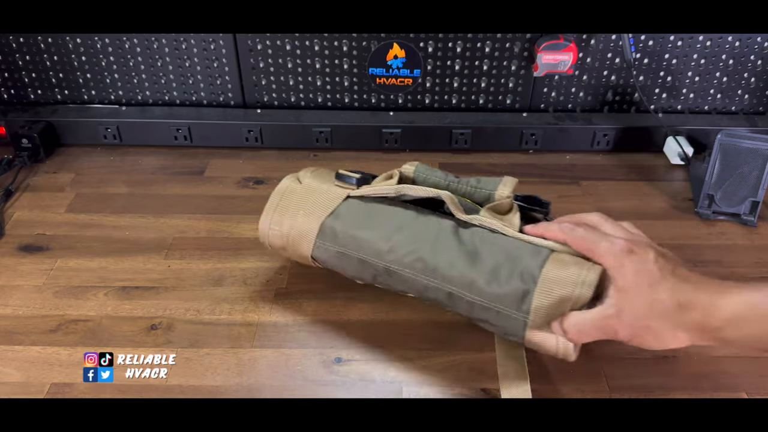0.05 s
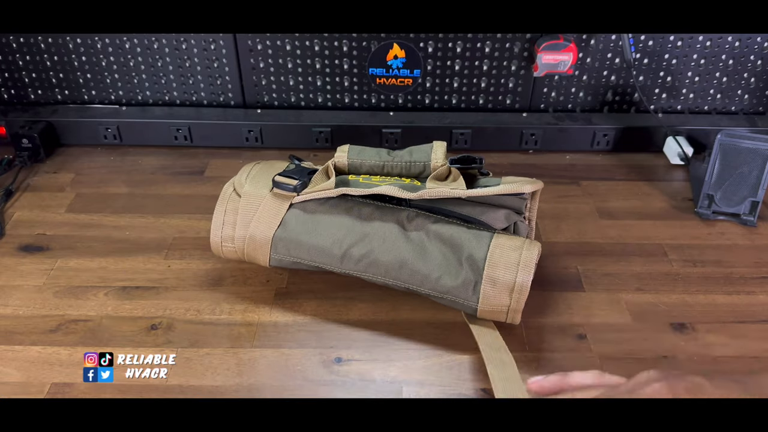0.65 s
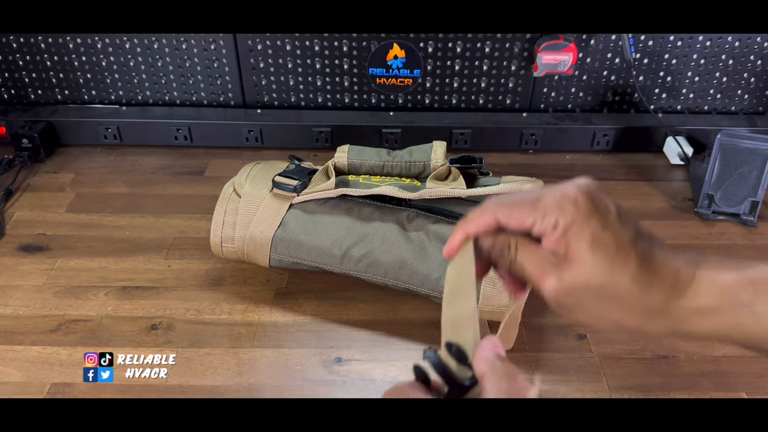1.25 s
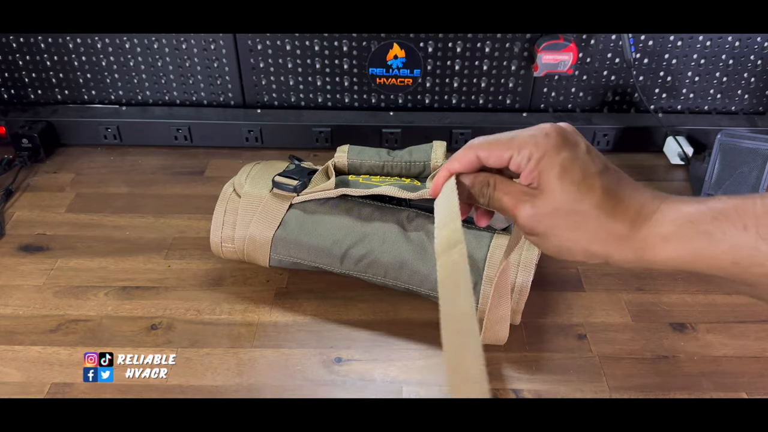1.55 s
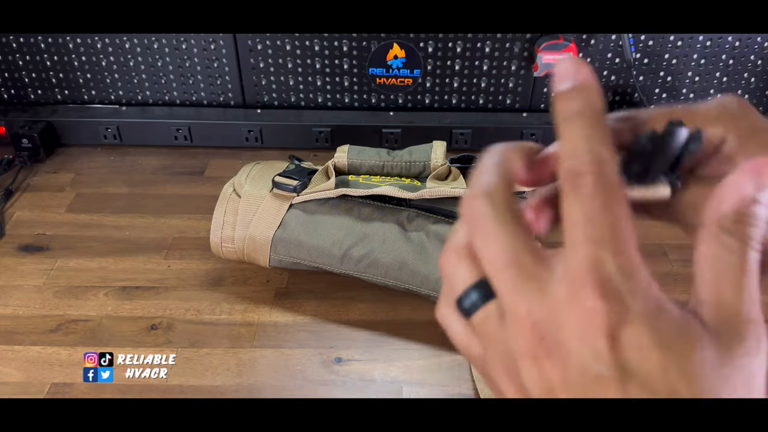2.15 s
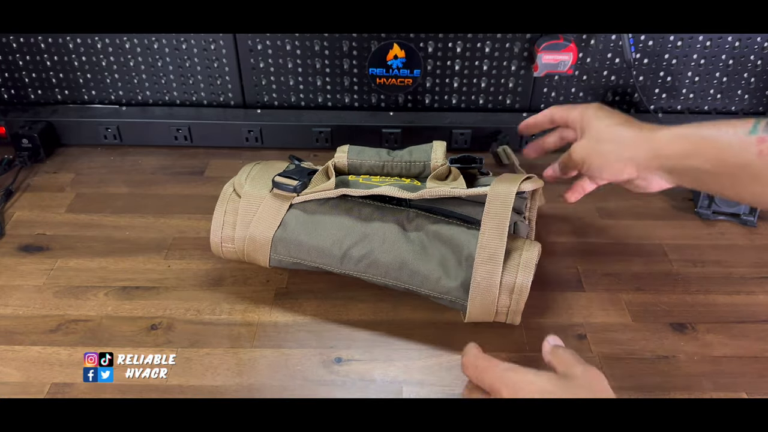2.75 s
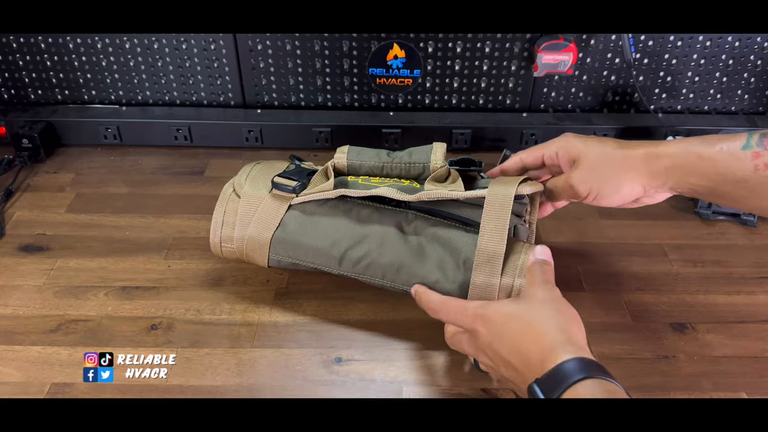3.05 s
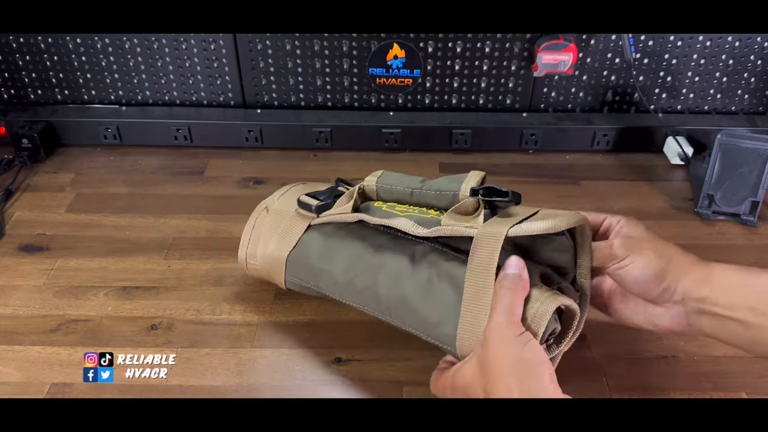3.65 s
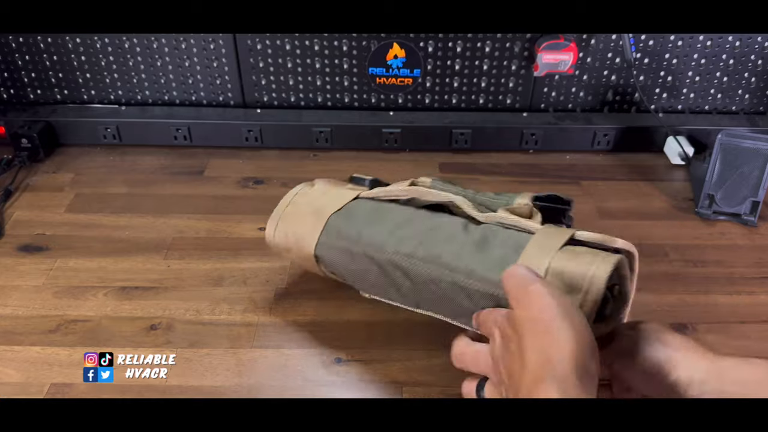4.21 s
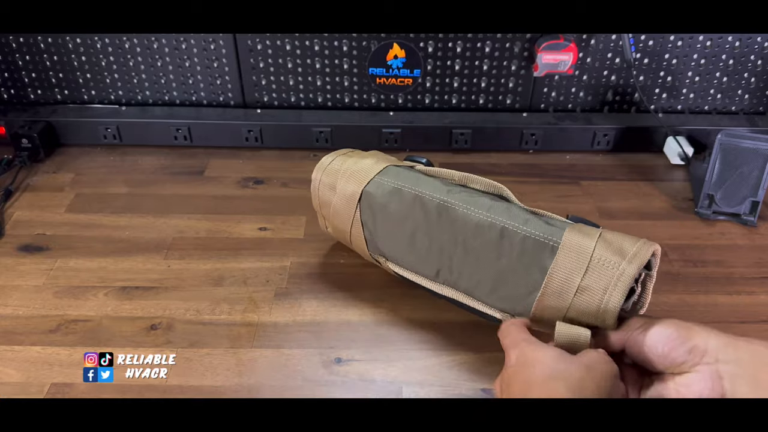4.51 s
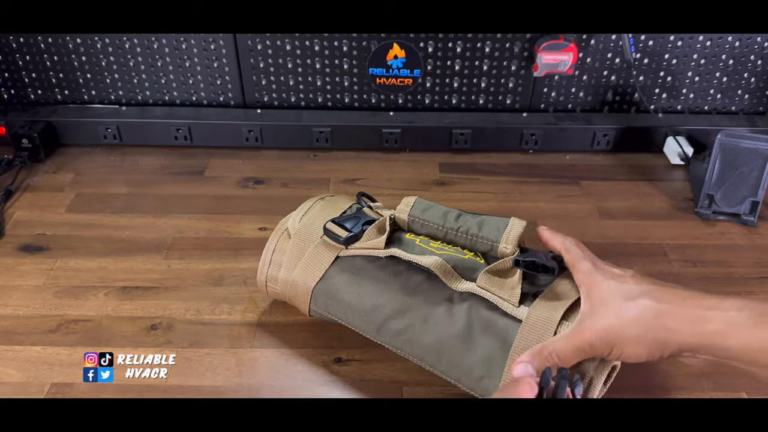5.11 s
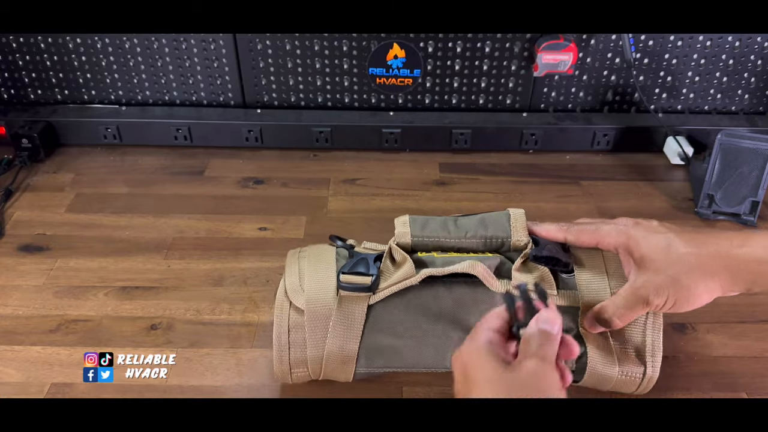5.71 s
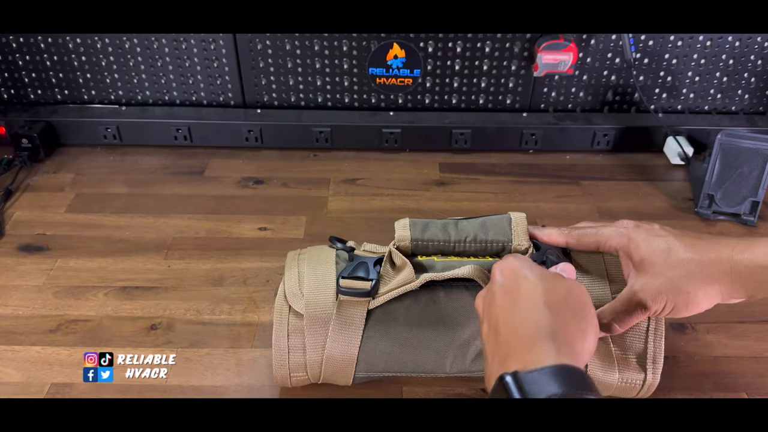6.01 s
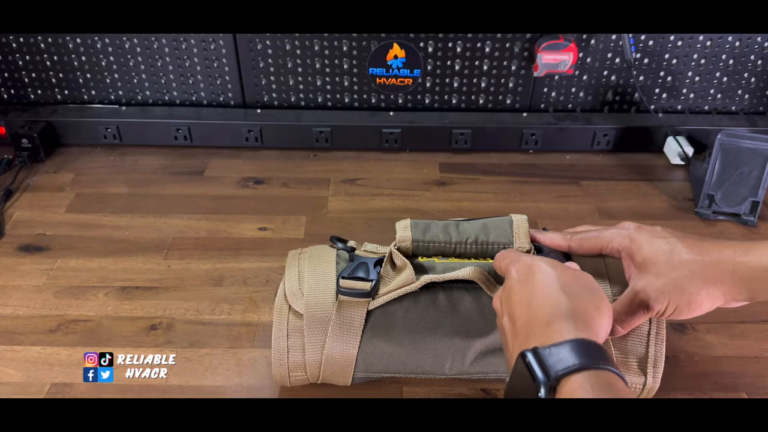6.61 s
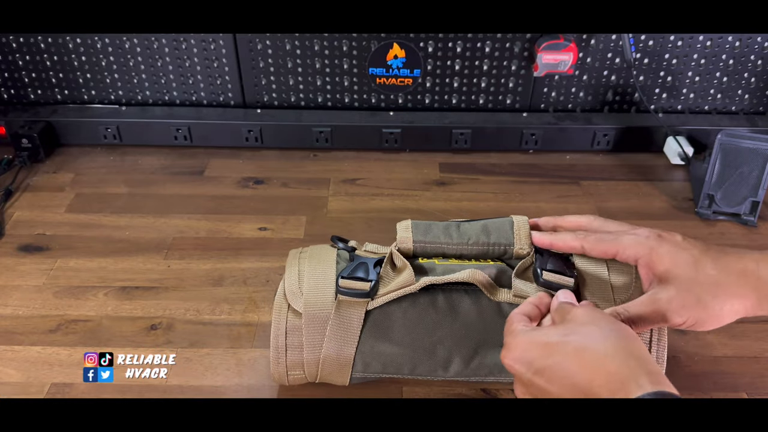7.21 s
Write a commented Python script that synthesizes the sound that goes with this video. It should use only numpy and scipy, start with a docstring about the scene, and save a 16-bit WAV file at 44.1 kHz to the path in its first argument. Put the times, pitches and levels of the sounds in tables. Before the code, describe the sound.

Soft cloth rustling and dull knocks, broken by a buckle clacking onto a wooden bench and then snapping shut.

```python
"""Buckling a canvas tool roll

A tool roll is handled on a wooden bench in a small workshop with a faint hum. Stick-slip friction
makes cloth and webbing rustle, and the tools inside knock dully. A flung plastic buckle excites
the modes of the bench with a clack. The roll is turned, the buckle is lined up, and its prongs
spring into their shell with a snap. Both loud impacts reverberate in the room."""
import sys
import numpy as np
from scipy import signal
from scipy.fft import rfft, irfft
from scipy.io import wavfile

SR = 44100
rng = np.random.default_rng(int(sys.argv[2]) if len(sys.argv) > 2 else 0)


def output_pcm(signal):
    """Save a mono or channel-first signal as 16-bit PCM at the path in sys.argv[1].

    Samples are clipped to [-1, 1] before scaling.
    """
    pcm = np.clip(np.atleast_2d(signal).T, -1, 1) * 32767
    wavfile.write(sys.argv[1], SR, np.round(pcm).astype(np.int16))


N = 320166

# still air of the workshop: (frequency [Hz], relative level [dB])
AIR_SPECTRUM = [(20, -7.5), (55, -5), (300, -6.5), (440, -13.5), (850, -19.5), (1100, -27), (2000, -32),
                (5000, -31.5), (16000, -38)]
# partials of the hum: (frequency [Hz], early level [dB], late level [dB])
HUM_PARTIALS = [(75, -71, -67), (108.4, -71.5, -74.5), (214.3, -76.5, -71), (237, -71.5, -91.5),
                (313.4, -85.5, -69)]
# reverberation time of the workshop: (frequency [Hz], t60 [s])
ROOM_DECAY = [(120, 0.34), (400, 0.56), (1000, 0.66), (2500, 0.64), (6000, 0.6), (15000, 0.4)]
# soft rub of the padded roll: (frequency [Hz], relative level [dB])
CANVAS_SPECTRUM = [(120, -11), (250, -9), (480, -0.5), (750, -3), (1050, -4.5), (1600, -11), (2600, -15),
                   (4500, -27), (12000, -39.5)]
# hiss of the weave: (frequency [Hz], relative level [dB])
WEAVE_SPECTRUM = [(800, -13.5), (2500, 3), (4200, -1.5), (6800, -6), (10000, -11), (16000, -25)]
# hands sliding the cloth: (start [s], duration [s], rub level [dB], hiss re rub before trim [dB])
HAND_STROKES = [(-0.08, 0.28, -57, -1), (0.35, 0.047, -64, 0), (1.175, 0.14, -55.5, 0),
                (1.21, 0.066, -53.5, -8), (2.9, 0.4, -57, -20), (3.2, 0.33, -54, -7.5),
                (3.27, 0.091, -59, -0.5), (3.54, 0.27, -54.5, -8), (3.82, 0.21, -59, -10),
                (3.98, 0.33, -52, -7.5), (4.32, 0.31, -61, -23), (4.64, 0.15, -59.5, -7),
                (4.905, 0.18, -57.5, -14.5), (5.14, 0.55, -56.5, -13), (5.27, 0.25, -57.5, -3.5),
                (5.72, 0.16, -64.5, -8.5), (5.94, 0.021, -57, -26)]
# low scuff of cloth on wood: (frequency [Hz], relative level [dB])
SCUFF_SPECTRUM = [(70, -22), (160, 1.5), (400, -5.5), (3000, -50)]
# rasp of the weave on wood: (frequency [Hz], relative level [dB])
RASP_SPECTRUM = [(400, -20), (1150, 2.5), (2600, -2.5), (3400, -10.5), (14000, -36)]
# roll and strap dragged on the bench: (start [s], duration [s], scuff level [dB], rasp re scuff [dB])
DRAGS = [(-0.02, 0.093, -56, -5.5), (0.15, 0.13, -58.5, 3), (0.93, 0.063, -54.5, -21),
         (2.07, 0.052, -63.5, -23)]
# webbing and seams catching: (time [s], level [dB], centre frequency [Hz], t60 [s])
SCRATCHES = [(3.967, -44.5, 4800, 0.043), (4.036, -50, 3170, 0.06), (4.056, -52, 4970, 0.028),
             (4.08, -53, 4180, 0.032), (4.119, -52, 4000, 0.04), (4.1475, -49, 6500, 0.027),
             (4.2074, -43, 6950, 0.016), (4.216, -45.5, 3300, 0.074), (4.944, -50, 3000, 0.043)]
# tools and fingers knocking: (time [s], peak level [dB], pitch [Hz], tick re body before boost [dB])
KNOCKS = [(0.206, -36, 520, -23), (0.283, -42, 760, -40), (1.226, -40, 960, -22), (1.266, -41, 610, -9),
          (2.908, -37, 497, -37), (3.089, -36, 550, -14.5), (3.137, -32.5, 655, -45),
          (3.274, -36, 484, -17), (3.449, -37.5, 520, -20), (3.472, -37.5, 520, -16),
          (4.058, -35.5, 520, -8), (4.144, -28.5, 676, -17), (4.171, -36, 501, -6), (4.208, -34, 520, -5),
          (4.324, -31.5, 1060, -36), (4.731, -37, 533, -18), (4.757, -35.5, 535, -19),
          (4.913, -43.5, 500, -35), (4.936, -40, 536, -22), (5.141, -40, 450, -23)]
# the roll settling on the bench: (time [s], level [dB], frequency [Hz], t60 [s])
BUMPS = [(0.117, -41.5, 125, 0.089), (3.351, -28, 134, 0.076), (3.368, -42, 158, 0.15)]
# hollow rub of the buckle on the roll: (frequency [Hz], relative level [dB])
HOLLOW_SPECTRUM = [(200, -24), (370, -11.5), (470, 2.5), (650, -11.5), (1000, -12), (2000, -25),
                   (8000, -44.5)]
# scrape of plastic on plastic: (frequency [Hz], half-width [Hz], relative level [dB])
SCRAPE_RESONANCES = [(3000, 600, -6), (5200, 300, -3.5), (7000, 400, 1)]
# the buckle worked along its webbing: (start [s], duration [s], rub level [dB], scrape re rub [dB])
NUDGES = [(5.725, 0.033, -65.5, -2.5), (6.045, 0.068, -56.5, -34), (6.18, 0.1, -60, -15),
          (6.51, 0.1, -58.5, -19.5), (6.65, 0.07, -62, -7), (6.85, 0.16, -57.5, -18)]
# the buckle halves touching: (time [s], level [dB], main resonance [Hz], t60 [s])
TOUCHES = [(6.0488, -54.5, 7000, 0.026), (6.2808, -48.5, 3050, 0.03), (6.48, -55.5, 2300, 0.024),
           (6.522, -54.5, 2200, 0.035), (6.5564, -48, 4400, 0.016), (6.57, -52.5, 4900, 0.013)]
# the shell colouring the buckle's click: (frequency [Hz], half-width [Hz], relative level [dB])
CLICK_RESONANCES = [(778, 25, -1), (930, 99, -10), (2380, 140, -3.5), (2567, 80, 0), (2950, 210, -10),
                    (3900, 290, -13.5), (4890, 160, -9.5), (5400, 160, -12.5), (6950, 560, -11.5),
                    (9100, 1500, -19.5)]
# the struck bench top, with nearby things faintly ringing on: (frequency [Hz], level [dB], t60 [s])
BENCH_AND_NEARBY_MODES = [(130, -35.5, 0.13), (263, -25.5, 0.07), (359, -35, 0.35), (426, -27.5, 0.079),
                          (503, -16, 0.035), (689, -18.5, 0.06), (860, -19.5, 0.035), (1070, -38, 0.46),
                          (1138, -37.5, 0.4), (1307, -37, 0.46), (1440, -21, 0.05), (1770, -14.5, 0.036),
                          (3190, -15.5, 0.018)]
# crack of the buckle landing: (frequency [Hz], relative level [dB])
CRACK_SPECTRUM = [(60, -24.5), (200, -8), (360, 0.5), (800, -4.5), (1200, -1), (2700, -10), (4000, -14.5),
                  (5200, -24), (8400, -31), (13000, -44)]
# the buckle's prongs and hollow shell: (frequency [Hz], level [dB], t60 [s])
BUCKLE_MODES = [(902, -20.5, 0.028), (1900, -27.5, 0.026), (2310, -21, 0.037), (2492, -20.5, 0.04),
                (2710, -19, 0.039), (3150, -23.5, 0.018), (3940, -20, 0.02), (4720, -14.5, 0.02),
                (5260, -22, 0.043), (6610, -12, 0.018), (9220, -19, 0.014)]


def amp(db):
    """Amplitude ratio of a level in decibels."""
    return 10 ** (np.asarray(db) / 20)


def unit_rms(x):
    """Normalisation to rms 1."""
    return x / np.sqrt(np.mean(x ** 2) + 1e-20)


def curve_at(points, hz):
    """Interpolation on a logarithmic frequency axis."""
    f, value = np.transpose(points)
    return np.interp(np.log(hz + 1), np.log(f + 1), value)


def coloured(x, spectrum):
    """Source-filter principle: an excitation shaped by a spectrum, at rms 1."""
    gain = amp(curve_at(spectrum, np.fft.rfftfreq(len(x), 1 / SR)))
    return unit_rms(irfft(rfft(x) * gain, len(x)))


def peaked(resonances):
    """Resonance: bell-shaped peaks summed into one spectrum."""
    hz = np.geomspace(20, SR / 2, 900)
    gain = sum(amp(db) / (1 + ((hz - centre) / width) ** 2) for centre, width, db in resonances)
    return np.column_stack([hz, 20 * np.log10(gain)])


def wander(corner_hz):
    """Random modulation: low-passed noise at rms 1."""
    hz = np.fft.rfftfreq(N, 1 / SR)
    return unit_rms(irfft(rfft(rng.standard_normal(N)) / (1 + (hz / corner_hz) ** 2), N))


def add(mix, s, sound):
    """Superposition of a sound starting at s seconds."""
    part = mix[max(round(s * SR), 0):][:len(sound)]
    part += sound[:len(part)]


def times(size=8192):
    """Time axis in seconds, by default that of one transient."""
    return np.arange(size) / SR


def decay(t, t60):
    """Damping: an exponential fall of 60 dB in t60 seconds."""
    return np.exp(-np.log(1000) * t / t60)


def envelope(t60, rise_s):
    """Transient response: a quick rise, then exponential decay."""
    t = times()
    return decay(t, t60) * (1 - np.exp(-t / rise_s))


def ring(modes, contact_s=0.0001):
    """Modal vibration after a brief contact; neighbouring modes start in opposite phase."""
    t = times()
    swing = sum((-1) ** k * amp(db) * decay(t, t60) * np.cos(2 * np.pi * hz * t)
                for k, (hz, db, t60) in enumerate(modes))
    return swing * (1 - np.exp(-(t / contact_s) ** 2))


def burst(spectrum, t60, rise_s=0.0001):
    """Modal overlap: dense, damped vibrations merge into decaying noise."""
    shape = envelope(t60, rise_s)
    return shape * coloured(rng.standard_normal(len(shape)), spectrum)


def pulse(spectrum, size=8192):
    """Minimum phase: the sharpest causal pulse with a given spectrum, at energy 1."""
    log_gain = np.log(amp(curve_at(spectrum, abs(np.fft.fftfreq(size, 1 / SR)))))
    wave = np.fft.ifft(np.exp(np.conj(signal.hilbert(log_gain)))).real
    return wave / np.linalg.norm(wave)


def stick_slip(per_s, spread_db, smooth):
    """Stick-slip friction: threads release as tiny uneven clicks in a smooth hiss."""
    size = amp(spread_db * np.minimum(rng.exponential(1, N), 4))
    slips = size * rng.choice([-1, 1], N) * (rng.random(N) < per_s / SR)
    return unit_rms(slips) + smooth * rng.standard_normal(N)


def sliding(strokes, attack_s=0.016, release_s=0.033, rub_arch_db=1, hiss_arch_db=3.5):
    """Friction noise grows with speed: rub and hiss gains peak mid-stroke, and strokes add in power."""
    t = times(N)
    rub_power, hiss_power = np.zeros(N), np.zeros(N)
    for start, length, db, bright_db in strokes:
        age = np.maximum(t - start, 0)
        moving = np.minimum(age / attack_s, 1) * np.exp(-np.maximum(age - length, 0) / release_s)
        slowness = 1 - np.sin(np.pi * np.minimum(age / length, 1))
        rub_power += (moving * amp(db - rub_arch_db * slowness)) ** 2
        hiss_power += (moving * amp(db + bright_db - hiss_arch_db * slowness)) ** 2
    return np.sqrt(rub_power), np.sqrt(hiss_power)


def background(air_db=-65, waver_rad=0.45):
    """Noise floor: quiet air and a phase-modulated hum whose partials shift in balance."""
    t = times(N)
    out = amp(air_db) * coloured(rng.standard_normal(N), AIR_SPECTRUM)
    for hz, early_db, late_db in HUM_PARTIALS:
        rms = amp(np.interp(t, [2.6, 4.8], [early_db, late_db]))
        out += np.sqrt(2) * rms * np.sin(2 * np.pi * hz * t + waver_rad * wander(8.1))
    return out


def workshop(x, gap_s=0.0042, build_s=0.0086):
    """Reverberation: reflections build up after a short gap and each band decays at its own rate."""
    hz, t, bands = signal.stft(rng.standard_normal(SR), SR, nperseg=256)
    tail = signal.istft(bands * decay(t, curve_at(ROOM_DECAY, hz)[:, None]), SR)[1]
    tail *= np.clip((times(len(tail)) - gap_s) / build_s, 0, 1)
    return signal.fftconvolve(x, tail / np.linalg.norm(tail))[:N]


def canvas_rustle(hiss_trim_db=-1, grip_db=1, rest_rub_db=-75, rest_hiss_db=-89):
    """Sliding friction: uneven jerks drive the soft rub of the canvas and the hiss of its weave."""
    rub, hiss = sliding(HAND_STROKES)
    rub = np.hypot(rub, amp(rest_rub_db))  # the cloth stirs faintly between strokes
    hiss = np.hypot(amp(hiss_trim_db) * hiss, amp(rest_hiss_db))
    threads = stick_slip(per_s=2500, spread_db=2.5, smooth=0.94)
    creases = stick_slip(per_s=900, spread_db=2.5, smooth=0.84)  # stiff folds give way less often
    grip = amp(grip_db * wander(33))
    return grip * (rub * coloured(threads, CANVAS_SPECTRUM) + hiss * coloured(creases, WEAVE_SPECTRUM))


def cloth_drags():
    """Friction on wood: dragged cloth scuffs the bench and rasps where it is pressed down."""
    scuff, rasp = sliding(DRAGS)
    slips = stick_slip(per_s=1500, spread_db=3, smooth=0.74)
    return scuff * coloured(slips, SCUFF_SPECTRUM) + rasp * coloured(slips, RASP_SPECTRUM)


def seam_scratches(relative_width=0.64, slips_per_s=2200, smooth=0.08):
    """Stick-slip release: a caught seam lets go in a dying run of sharp slips."""
    out = np.zeros(N)
    for s, db, hz, t60 in SCRATCHES:
        shape = envelope(t60, rise_s=0.00068)
        size = len(shape)
        slips = rng.choice([-1, 1], size) * (rng.random(size) < slips_per_s / SR)
        friction = slips + smooth * rng.standard_normal(size)
        add(out, s, amp(db) * shape * coloured(friction, peaked([(hz, relative_width * hz, 0)])))
    return out


def tool_knocks(body_t60=0.059, tick_boost_db=3):
    """Damped impact: muffled knocks of tools and fingers, each a dull body and a shorter tick."""
    out = np.zeros(N)
    tick_spectrum = [(900, -24), (2800, 15), (4500, 0.5), (8000, -6), (15000, -29)]
    for s, db, hz, tick_db in KNOCKS:
        body_spectrum = [(hz / 4, -24), (hz * 0.53, -6), (hz, 0), (hz * 1.28, -5),
                         (hz * 2, -11), (hz * 5, -29), (hz * 16, -58)]
        body = burst(body_spectrum, body_t60, rise_s=0.00047)
        tick = burst(tick_spectrum, 0.63 * body_t60, rise_s=0.00042)
        knock = body + amp(tick_db + tick_boost_db) * tick
        add(out, s, amp(db) * knock / abs(knock).max())
    return out


def roll_bumps():
    """Soft impact: the heavy padded roll meets the bench and excites one low, damped mode."""
    out = np.zeros(N)
    for s, db, hz, t60 in BUMPS:
        add(out, s, amp(db) * np.sin(2 * np.pi * hz * times()) * envelope(t60, rise_s=0.0024))
    return out


def buckle_nudges(grip_db=2):
    """Friction drives resonances: the pushed buckle rubs hollowly on the roll and its plastic scrapes."""
    rub, scrape = sliding(NUDGES)
    slips = stick_slip(per_s=840, spread_db=1.5, smooth=0.91) * amp(grip_db * wander(46))
    return rub * coloured(slips, HOLLOW_SPECTRUM) + scrape * coloured(slips, peaked(SCRAPE_RESONANCES))


def buckle_touches(half_width_hz=750, shell_db=-7, rise_s=0.0002):
    """Selective excitation: where the buckle halves touch decides which part rings most."""
    out = np.zeros(N)
    for s, db, hz, t60 in TOUCHES:
        part = burst(peaked([(hz, half_width_hz, 0)]), t60, rise_s)
        shell = burst(peaked(CLICK_RESONANCES), t60, rise_s)
        add(out, s, amp(db) * (part + amp(shell_db) * shell))
    return out


def buckle_clack(land_s=2.640, flat_s=2.6425, room_db=3.5):
    """Impulse excitation: the buckle lands on edge, rings bench and nearby things, and chatters flat."""
    direct, to_room = np.zeros(N), np.zeros(N)
    crack = pulse(CRACK_SPECTRUM)
    add(direct, land_s, ring(BENCH_AND_NEARBY_MODES) + amp(-2) * crack)
    add(direct, flat_s, amp(-16) * burst(CRACK_SPECTRUM, t60=0.061, rise_s=0.00018))
    add(direct, land_s, amp(-27) * burst(peaked(CLICK_RESONANCES), t60=0.033))  # the plastic's own click
    add(to_room, land_s, amp(room_db) * crack)
    bass_cut = signal.butter(2, 110, "highpass", fs=SR)  # so light a blow radiates no deep bass
    treble_cut = signal.butter(1, 7500, fs=SR)  # the bench radiates little treble into the room
    return signal.lfilter(*bass_cut, direct) + workshop(signal.lfilter(*treble_cut, to_room))


def buckle_snap(first_s=6.7051, second_s=6.7076, seat_s=6.7119, room_db=-2.5):
    """Elastic release: two prongs spring into their shell in turn, then the catch seats and rings."""
    direct, to_room = np.zeros(N), np.zeros(N)
    click = peaked(CLICK_RESONANCES)
    edge_scrape = [(3000, -33.5), (10000, 1.5), (16000, -10)]
    add(direct, first_s, ring(BUCKLE_MODES) + amp(-15) * burst(click, t60=0.017))
    add(direct, first_s, amp(-26) * burst(edge_scrape, t60=0.031))
    add(direct, second_s, amp(-21) * burst(click, t60=0.031))
    add(direct, seat_s, ring([(2440, -22, 0.06)]))
    add(to_room, first_s, amp(room_db) * pulse(click))
    return direct + workshop(to_room)


def scene(handling_room_db=-10):
    """Superposition of close handling, its reverberation, two loud buckle sounds and the background."""
    handling = canvas_rustle() + cloth_drags() + seam_scratches() + buckle_nudges()
    handling += tool_knocks() + roll_bumps() + buckle_touches()
    reverberation = amp(handling_room_db) * workshop(handling)
    return (handling + reverberation + buckle_clack() + buckle_snap() + background())[None]


def record(dry, cutoff_hz=15900):
    """Band limiting: a linear-phase low-pass removes the highest treble."""
    lowpass = signal.firwin(255, cutoff_hz, window=("kaiser", 9), fs=SR)
    return signal.oaconvolve(dry, lowpass[None], "same")


dry = scene()
out = record(dry)
output_pcm(out)
```